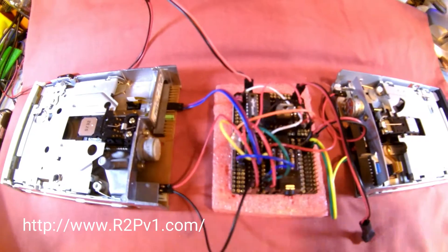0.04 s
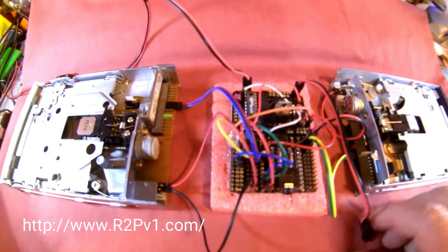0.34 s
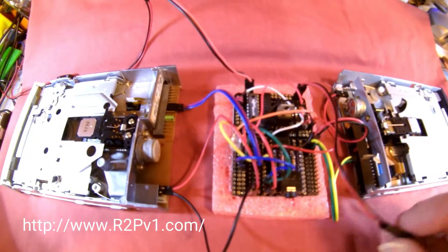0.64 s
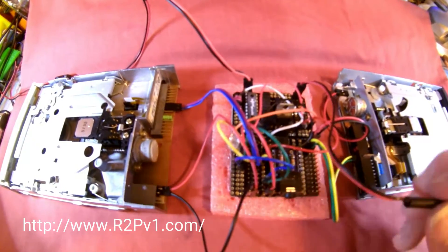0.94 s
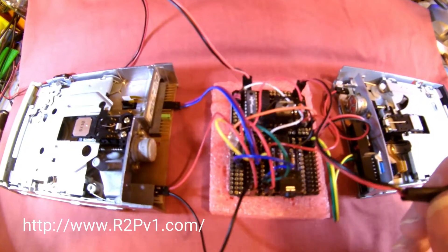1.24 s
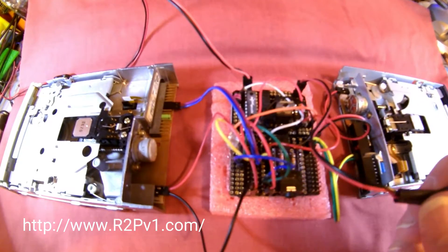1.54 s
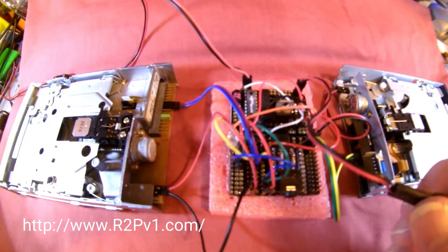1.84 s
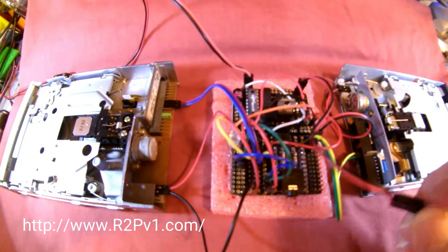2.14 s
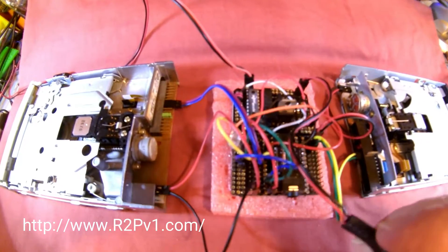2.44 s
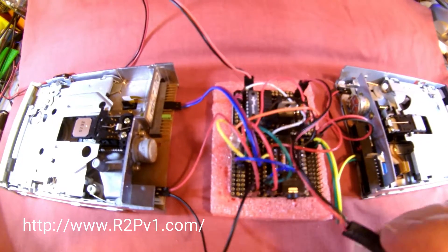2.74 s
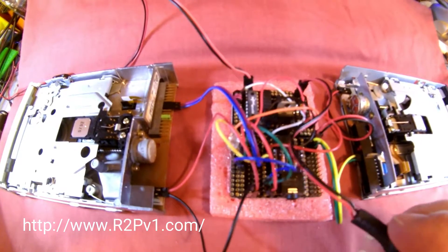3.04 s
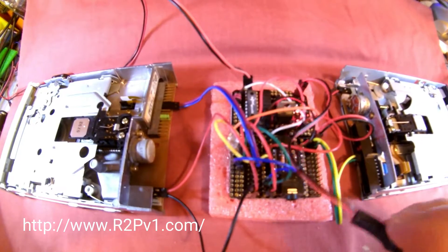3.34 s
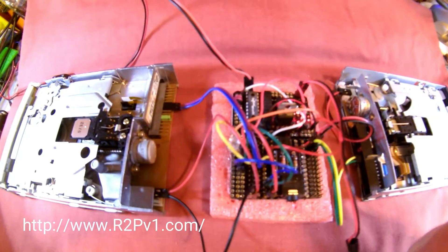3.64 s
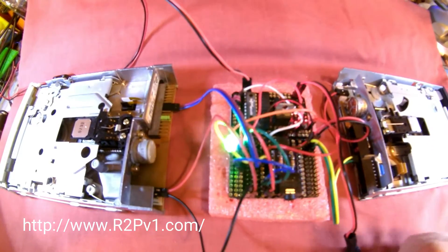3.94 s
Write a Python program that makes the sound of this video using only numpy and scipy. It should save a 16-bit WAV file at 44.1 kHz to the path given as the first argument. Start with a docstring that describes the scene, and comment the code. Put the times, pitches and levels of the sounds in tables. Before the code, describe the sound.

A disk drive's short rattling buzz follows a plug's snap, over fan hiss and hum.

```python
"""Fan hiss, low rumble and a throbbing mains hum fill the room around a bench of bare floppy drives.
At three seconds, close up, a power plug snaps over its pins and scrapes home in tiny slips that ring
the drive. Then a stepper motor buzzes for a third of a second: each step rattles the head carriage
and rings the metal chassis, hardest over the last few steps."""
import sys
import numpy as np
from scipy import signal
from scipy.fft import rfft, irfft
from scipy.io import wavfile
from scipy.ndimage import uniform_filter1d

SR = 44100
rng = np.random.default_rng(int(sys.argv[2]) if len(sys.argv) > 2 else 0)


def transcribe(u):
    """Save the signal u as a 16-bit wav file named by the first command-line argument.

    u: samples, shape (n,) or (channels, n), limited to [-1, 1]; the rate is SR.
    q: integer samples, one column per channel.
    """
    v = np.clip(np.atleast_2d(u).T, -1, 1)
    q = np.round(v * 32767).astype(np.int16)
    wavfile.write(sys.argv[1], SR, q)


N = 176400
TIME = np.arange(N) / SR

# tone of the fan hiss: f/Hz, relative level/dB
HISS_EQ = [(94, -17), (160, -5), (176, -2.5), (230, -3), (371, -7), (409, -8.5), (433, -7.5), (458, -11.5),
           (485, -6.5), (879, -19), (1310, -15), (1890, -21.5), (2040, -25.5), (3170, -31), (8730, -38.5),
           (10400, -36), (15500, -42.5)]
# brief dips in the hiss's treble: t/s, half length/s, depth/dB
TREBLE_DIPS = [(0.242, .008, 9), (.877, 0.013, 12), (1.683, 0.012, 7), (2.027, 0.013, 6),
               (2.137, 0.0058, 19), (2.537, .008, 11), (2.606, 0.0049, 18), (2.86, 0.0073, 12),
               (2.954, .018, 9), (3.173, 0.015, 12)]
# tone of the room rumble: f/Hz, relative level/dB
RUMBLE_EQ = [(10, -21), (28, 1), (40, -2), (100, 0.5), (150, -0.5), (185, 2), (215, -15), (300, -54)]
# envelope of the mains hum: t/s, level/dB
HUM_ENVELOPE = [(0.0, -21), (0.11, -19.5), (0.36, -19), (0.39, -22.5), (0.48, -16.5), (0.56, -20),
                (0.67, -18), (0.75, -22), (0.8, -17.5), (1.11, -22), (1.15, -18.5), (1.43, -22.5),
                (1.53, -18.5), (1.76, -24.5), (1.86, -20.5), (1.98, -21), (2.13, -27), (2.18, -20.5),
                (2.24, -20.5), (2.34, -25), (2.37, -22), (2.48, -32.5), (2.55, -20), (2.86, -31.5),
                (2.91, -20.5), (3.09, -29.5), (3.11, -34), (3.17, -28), (3.2, -33), (3.27, -22),
                (3.38, -33), (3.42, -25), (3.49, -39), (3.51, -25), (3.53, -26), (3.58, -39), (3.61, -26),
                (3.74, -32), (3.79, -26), (3.82, -37), (3.88, -20), (3.93, -37), (3.97, -28), (4.0, -29)]
# thin tones of the fans: f/Hz, level/dB
FAN_WHINES = [(435.4, -41.5), (834.4, -51), (973, -56.5), (1308, -54), (1836, -69), (1902, -56.5),
              (1923, -51.5), (9900, -68.5), (10000, -66), (10090, -64.5), (10250, -70), (10650, -67.5),
              (10780, -73)]
# the plug's slides along its pins: t/s, length/s, level/dB
SLIDES = [(3.0035, 0.0089, -28.5), (3.0184, .014, -29.5), (3.032, 0.0091, -24), (3.044, 0.0106, -28.5)]
# tone of the scrape: f/Hz, relative level/dB
SCRAPE_EQ = [(240, -37), (400, -7), (567, -0.5), (1040, -22), (1540, 0), (1850, -17), (2000, -22),
             (2510, -12), (2740, -19), (2960, -12), (3450, -22), (5770, -21.5), (7700, -29), (11100, -27),
             (15000, -39)]
# drive resonances under the scrape: f/Hz, width/Hz, relative level/dB
SCRAPE_MODES = [(584, 19, 1.5), (1460, 40, -13), (1583, 29, -7), (1830, 70, 4)]
# the plug's snap and its bounce: t/s, level/dB
SNAPS = [(3.0087, -15), (3.0095, -22.5)]
# ring of the plug: f/Hz, relative level/dB, t60/s
PLUG_MODES = [(3620, -2, 0.0083), (4100, -5.5, .009), (5770, 1, 0.0069), (6150, -3, .007), (7224, 0, 0.006),
              (8900, -7, .006), (11400, -6.5, 0.0065), (14600, -11, .006)]
# knocks as the plug seats: t/s, f/Hz, level/dB, t60/s
KNOCKS = [(3.017, 549, -23, 0.14), (3.033, 1598, -26, .09)]
# strength of the motor's steps: t/s, gain/dB
STEP_FORCE = [(3.62, -1), (3.72, -1.5), (3.82, -1), (3.865, 2), (3.92, 0.5), (3.96, 0)]
# ring of the chassis: f/Hz, level/dB, t60/s, delay after the step/s
CHASSIS_MODES = [(215, -29, .08, 0.00096), (260, -22.5, 0.086, 0.00098), (322, -30, 0.074, .001),
                 (472, -31, 0.066, 0.0022), (535, -25, 0.045, 0.0014), (633, -28.5, 0.056, .002),
                 (804, -28.5, 0.071, 0.00097), (857, -29.5, 0.091, 0.0011), (1000, -34, .06, 0.00097),
                 (1215, -33, 0.046, 0.0015), (1400, -32, 0.057, 0.00098), (1478, -23.5, 0.042, 0.00108),
                 (1620, -26, 0.055, 0.00096), (2036, -31, 0.049, 0.00099), (2700, -46, 0.042, 0.0009),
                 (2770, -38.5, 0.075, 0.00099), (3730, -41, 0.043, 0.00096)]
# noise bands of the head carriage: delay/s, f/Hz, width/Hz, relative level/dB, t60/s,
# share that is new at each step/0-1, gain in the hard steps/dB
CARRIAGE_BANDS = [(0.00021, 8820, 710, -28.5, 0.0072, .5, 1.5), (0.00098, 10560, 260, -33.5, 0.018, 0.3, 2),
                  (0.0024, 11050, 400, -32, .012, .5, 0), (.0004, 11860, 700, -34, .014, .6, -2),
                  (.0005, 14500, 900, -39, .018, .7, -4), (0.00048, 4600, 2400, -38, 0.025, .5, 1),
                  (.0022, 1600, 550, -36.5, 0.028, 0.86, 4), (.0004, 10000, 1000, -38, 0.016, 0.8, -9),
                  (.001, 2690, 1000, -40, 0.063, 0.2, 3), (.0006, 5700, 460, -43.5, .03, 0.25, 0.5),
                  (0.00066, 6900, 830, -44, 0.025, 0.6, 1)]


def amp(db):
    """Decibels to gain."""
    return 10 ** (np.asarray(db) / 20)


def unit(x):
    """Scales to an rms of one."""
    return x / np.sqrt(np.mean(x ** 2) + 1e-20)


def equalise(x, curve):
    """Shapes a sound with an EQ curve drawn over log frequency, at unit rms."""
    hz, db = np.transpose(curve)
    bins = np.fft.rfftfreq(len(x), 1 / SR)
    gain = amp(np.interp(np.log(bins + 1), np.log(hz + 1), db))
    return unit(irfft(rfft(x) * gain, len(x)))


def band(x, hz, width):
    """Keeps a soft-edged band, at unit rms."""
    bins = np.fft.rfftfreq(len(x), 1 / SR)
    return unit(irfft(rfft(x) / (1 + (2 * (bins - hz) / width) ** 2), len(x)))


def wander(rate_hz):
    """Slow random motion up to about the given rate."""
    return band(rng.standard_normal(N), 0, 2 * rate_hz)


def ring(t, hz, db, t60, attack_s):
    """One mode that swells and dies, silent before t = 0."""
    t = np.maximum(t, 0)
    return amp(db - 60 * t / t60) * (1 - np.exp(-t / attack_s)) * np.sin(2 * np.pi * hz * t)


def add(mix, s, sound):
    """Mixes a sound in at time s."""
    part = mix[round(s * SR):][:len(sound)]
    part += sound[:len(part)]


def fan_hiss():
    """A bed of moving air, faintly mottled; its treble flickers and briefly dips."""
    frames = dict(nperseg=512, noverlap=384)
    hz, t, spectrum = signal.stft(equalise(rng.standard_normal(N), HISS_EQ), SR, **frames)
    patches = uniform_filter1d(rng.standard_normal(spectrum.shape), size=8, axis=0)
    patches_db = 0.97 * unit(uniform_filter1d(patches, size=20, axis=1))
    flicker_db = 1.2 * unit(uniform_filter1d(rng.standard_normal(len(t)), size=8))
    dips_db = sum(db * np.exp(-((t - s) / half) ** 2) for s, half, db in TREBLE_DIPS)
    treble = 1 - 1 / (1 + (hz[:, None] / 2480) ** 4)  # fades in around 2480 Hz
    spectrum = spectrum * amp(patches_db + treble * (flicker_db - dips_db))
    return amp(-29) * signal.istft(spectrum, **frames)[1][:N]


def room_rumble():
    """Steady low noise that puts weight under the hiss."""
    return amp(-35.5) * equalise(rng.standard_normal(N), RUMBLE_EQ + [(2000, -100)])


def tone(hz, db):
    """A sine that follows a pitch curve and an rms level curve."""
    return np.sqrt(2) * amp(db) * np.sin(2 * np.pi * np.cumsum(hz) / SR)


def mains_hum(pitch_hz=118.8, swing_hz=1.45, throbs_per_s=2.6):
    """One low tone that throbs in pitch and level and slowly fades."""
    hz = pitch_hz + swing_hz * np.cos(2 * np.pi * throbs_per_s * TIME)
    return tone(hz, np.interp(TIME, *np.transpose(HUM_ENVELOPE)))


def fan_whines(drift=0.00121, waver_db=2.0):
    """The fans' thin tones, each wavering on its own in pitch and level."""
    return sum(tone(hz * (1 + drift * wander(rate_hz=11.5)), db + waver_db * wander(rate_hz=14))
               for hz, db in FAN_WHINES)


def plug_scrape(slips_per_s=3000):
    """The plug slides on its pins in tiny slips, a gritty friction that rings the drive."""
    t, friction = np.arange(4096) / SR, np.zeros(N)
    for s, length, db in SLIDES:
        n = round(length * SR)
        grit = rng.standard_normal(N) * (0.25 + (rng.random(N) < slips_per_s / SR))
        slide = unit(equalise(grit, SCRAPE_EQ)[:n])
        add(friction, s, amp(db) * slide * signal.windows.tukey(n, 0.3))
    body = sum(amp(db) * width / SR * np.exp(-np.pi * width * t) * np.cos(2 * np.pi * hz * t)
               for hz, width, db in SCRAPE_MODES)
    return friction + amp(21) * signal.fftconvolve(friction, body)[:N]


def plug_snap():
    """The plug snaps over the pins and bounces: two bright clicks, each slightly detuned."""
    t, out = np.arange(4096) / SR, np.zeros(N)
    for s, snap_db in SNAPS:
        detune = 1 + 0.008 * rng.standard_normal(len(PLUG_MODES))
        click = sum((-1) ** k * ring(t, hz * detune[k], db, t60, attack_s=0.0001)
                    for k, (hz, db, t60) in enumerate(PLUG_MODES))
        add(out, s, amp(snap_db) * click)
    return out


def plug_knocks():
    """Two soft-edged knocks ring out as the plug seats."""
    return sum(ring(TIME - s, hz, db, t60, attack_s=0.0046) for s, hz, db, t60 in KNOCKS)


def chassis_ring(t):
    """One step sets the metal chassis ringing, with the lows cut below 171 Hz."""
    modes = sum(ring(t - delay, hz, db, t60, attack_s=0.0016) for hz, db, t60, delay in CHASSIS_MODES)
    return signal.sosfilt(signal.butter(2, 171, "high", fs=SR, output="sos"), modes)


def carriage_rattle(t, shared_noise, hard, attack_s=0.0006):
    """One step jolts the head carriage: noise bursts, partly the same each time and partly new."""
    out = np.zeros(len(t))
    for shared, (delay, hz, width, db, t60, new, hard_db) in zip(shared_noise, CARRIAGE_BANDS):
        age = np.maximum(t - delay, 0)
        noise = np.sqrt(1 - new) * shared + np.sqrt(new) * rng.standard_normal(len(t))
        envelope = np.minimum(age / attack_s, 1) * amp(db + hard_db * hard - 60 * age / t60)
        burst = band(noise, hz, width) * envelope
        out += burst * np.linalg.norm(envelope) / np.linalg.norm(burst)  # the envelope sets the energy
    return amp(3) * out


def stepper(start_s=3.6198, steps=19, steps_per_s=53.22, hard_from_s=3.84, spread_db=1.6):
    """The motor's evenly timed steps, each a ring and a rattle, run together into a buzz."""
    t, out = np.arange(4096) / SR, np.zeros(N)
    chassis = chassis_ring(t)
    shared_noise = rng.standard_normal((len(CARRIAGE_BANDS), len(t)))
    for s in start_s + np.arange(steps) / steps_per_s:
        rattle = carriage_rattle(t, shared_noise, hard=s > hard_from_s)
        force_db = np.interp(s, *np.transpose(STEP_FORCE)) + spread_db * rng.standard_normal()
        add(out, s, amp(force_db) * (chassis + rattle))
    return out


def bench_reflections(x, t60=0.096, predelay_s=0.003, wet_db=-9):
    """Adds a short, faint tail thrown back by the bench and the room."""
    t = np.arange(SR // 4) / SR
    tail = rng.standard_normal(len(t)) * amp(-60 * t / t60) * (t > predelay_s)
    return x + amp(wet_db) * signal.fftconvolve(x, tail / np.linalg.norm(tail))[:N]


def scene():
    """A mono mix: the room bed, with the plug and the drive up close."""
    bed = fan_hiss() + room_rumble() + mains_hum() + fan_whines()
    action = stepper() + plug_snap() + plug_scrape() + plug_knocks()
    return (bed + bench_reflections(action))[None]


def record(dry):
    """A steep high cut at 15830 Hz."""
    high_cut = signal.firwin(801, 15830, window=("kaiser", 9), fs=SR)
    return signal.oaconvolve(dry, high_cut[None], "same")


dry = scene()
out = record(dry)
transcribe(out)
```